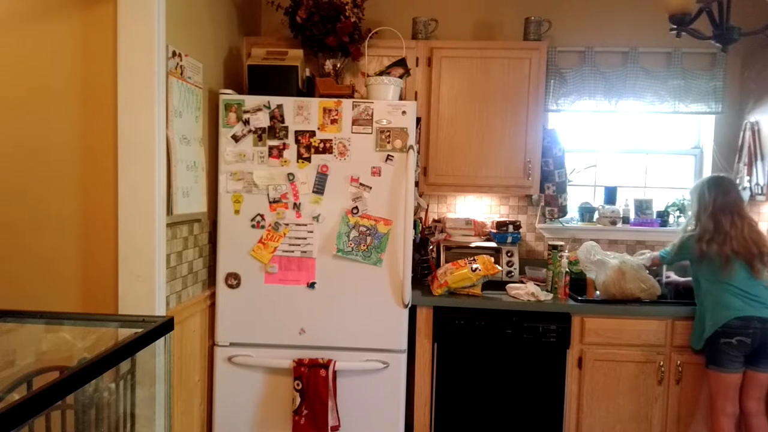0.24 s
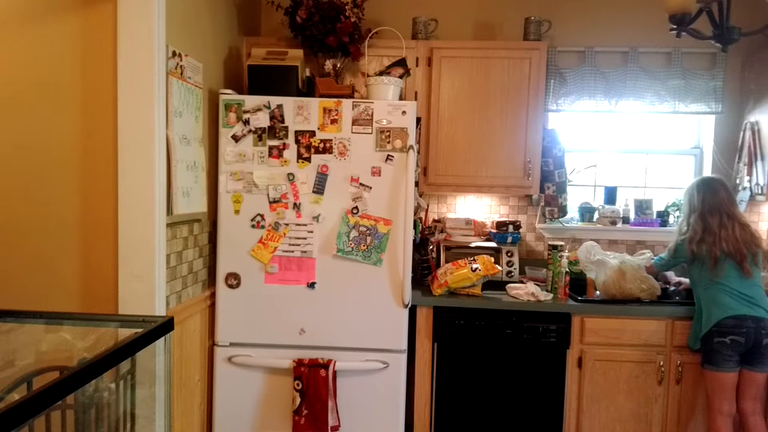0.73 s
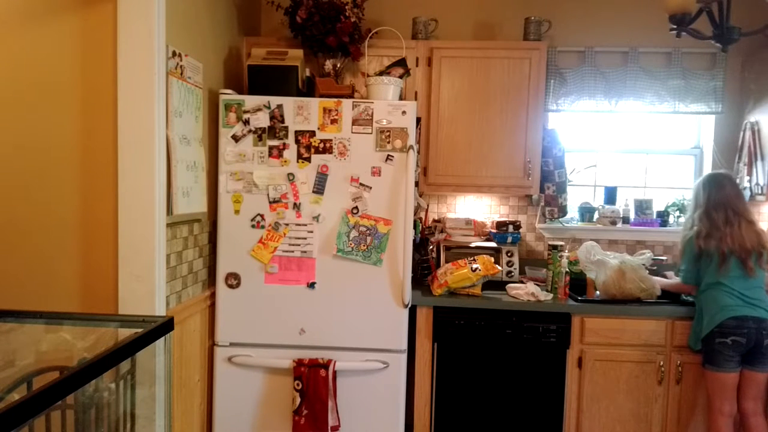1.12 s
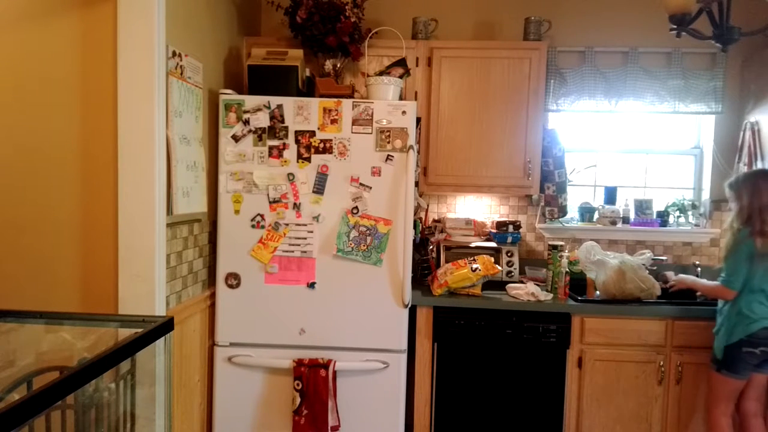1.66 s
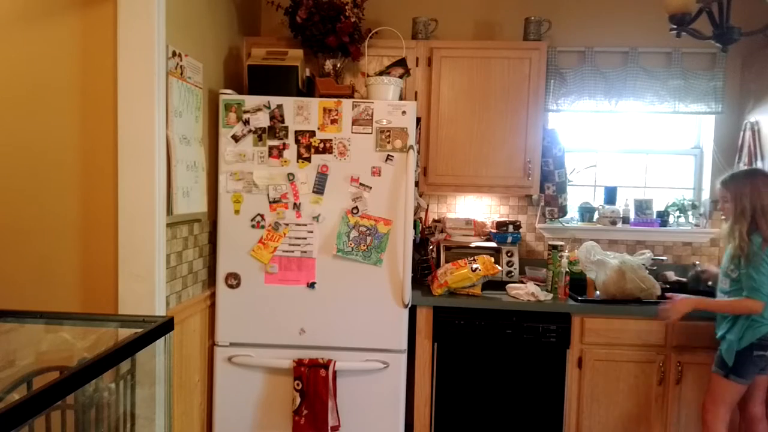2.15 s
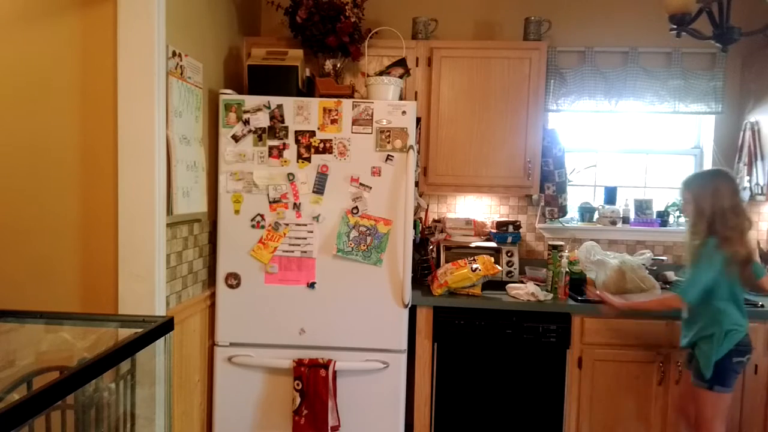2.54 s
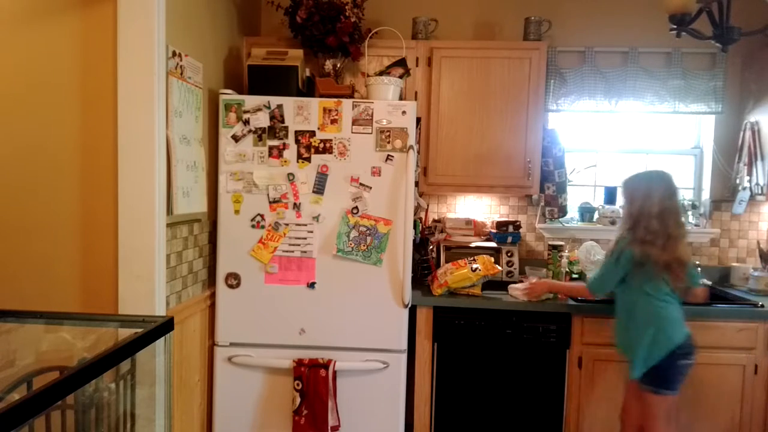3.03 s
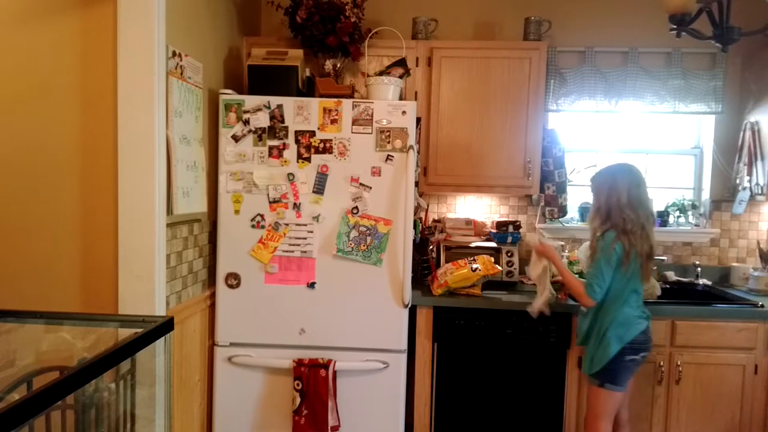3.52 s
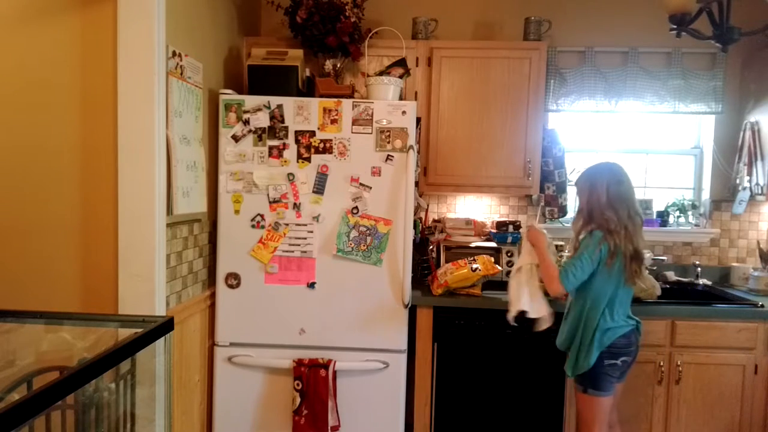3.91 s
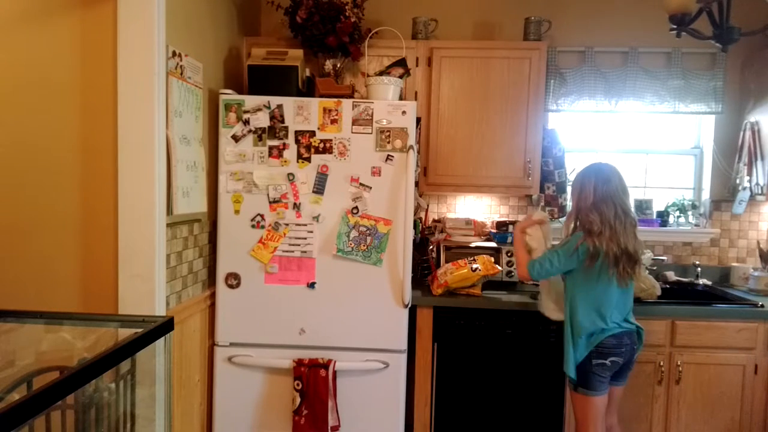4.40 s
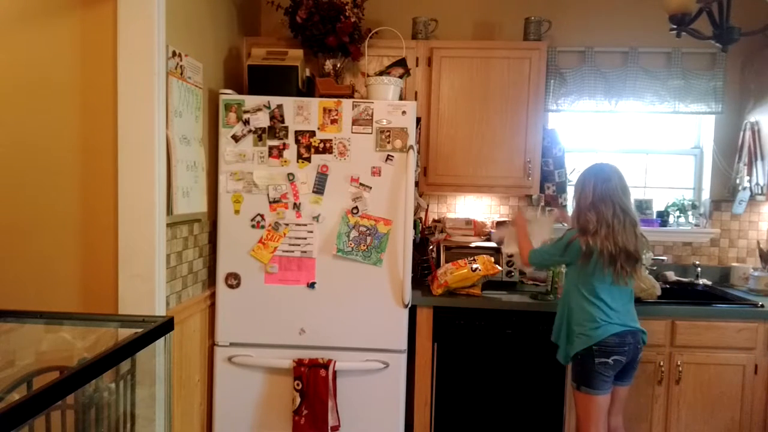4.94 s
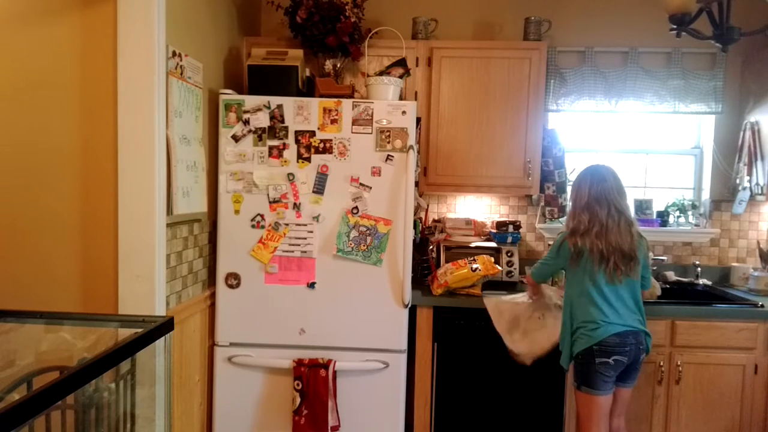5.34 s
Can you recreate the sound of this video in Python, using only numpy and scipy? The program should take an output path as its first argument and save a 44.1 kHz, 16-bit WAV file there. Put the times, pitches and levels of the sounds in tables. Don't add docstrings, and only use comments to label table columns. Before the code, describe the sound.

Over a low pulsing fridge hum, brief running water stops, three loud sink knocks follow, then dull footfalls, two counter clacks and a final cloth rustle.

```python
import sys
import numpy as np
from scipy import signal
from scipy.fft import rfft, irfft, next_fast_len
from scipy.io import wavfile
from scipy.ndimage import uniform_filter1d

SR = 44100
rng = np.random.default_rng(int(sys.argv[2]) if len(sys.argv) > 2 else 0)


def amplitude_ratio(level_db):
    exponent = np.asarray(level_db, float) / 20
    return 10 ** exponent


def dump(signal):
    limited = np.clip(np.atleast_2d(signal).T, -1, 1)
    pcm = np.round(limited * 32767).astype(np.int16)
    wavfile.write(sys.argv[1], SR, pcm)


N = 245716

# pitch_hz, level_db [dB per Hz]
AIR_TONE = [(11, -33.5), (18, -13.5), (27, -23.5), (41, -7), (64, -9), (86, -6.5), (160, -6.5), (189, -10),
            (290, -8), (334, -13), (396, -6), (572, -14), (1040, -14), (1630, -23), (15800, -40.5)]
# pitch_hz, likeness [0..1]
MIC_LIKENESS = [(30, 1), (250, 0.85), (600, 0.78), (1200, 0.36), (2500, 0.05), (6000, 0.017),
                (16000, 0.025)]
# pitch_hz, t60_s
ROOM_T60 = [(60, 0.45), (250, 0.4), (600, 0.28), (1500, 0.37), (4000, 0.35), (9000, 0.31), (16000, 0.24)]
# pitch_hz, level_db
AIR_SHADE = [(60, 2.5), (240, 1), (950, 4), (3770, -1), (15000, -8)]
TAP_SHADE = [(500, 2.5), (1500, 10.5), (4000, 0), (8000, -8), (13000, 4.5)]
BASIN_SHADE = [(100, 2), (400, 2), (2000, 5), (5000, -5.5), (12000, -4.3)]

# time_s, level_db
FLOW = [(0.0, -48.5), (0.29, -56.5), (0.442, -54), (0.502, -51.5), (0.702, -44), (0.748, -49), (0.84, -54),
        (0.93, -72.5), (1.08, -84)]
# pitch_hz, level_db [dB per Hz]
JET_TONE = [(290, -63.5), (500, -10.5), (783, -28), (1140, -10), (1300, -14), (1840, -11.5), (3090, -12.5),
            (4900, -12), (5830, -11), (8130, -15.5), (9120, -12), (10100, -13), (15800, -19.5)]
# pitch_hz, width_hz, level_db
VALVE_MODES = [(4110, 350, -12), (5900, 600, -7), (7270, 320, -10), (9350, 500, -9), (10500, 1400, -4)]
# start_s, length_s, level_db, first_hz, last_hz
GURGLES = [
    (.5, 0.13, -54, 2270, 1620),
    (0.557, 0.1, -49.5, 1540, 2250),
    (0.644, 0.059, -52, 2070, 1930),
    (0.662, 0.043, -48.5, 1120, 940),
]
# start_s, peak_db, tilt_db [per octave], length_s
SPLASHES = [(0.158, -23.5, 2.1, 0.015), (0.3118, -39, 1.5, 0.011), (0.4138, -36, 2, 0.0086),
            (0.4534, -37.5, 0.7, 0.014), (0.4916, -35, -5, 0.013), (0.5204, -60, -3, 0.014),
            (0.756, -22.5, -1, 0.0093), (0.7912, -23, -5.5, 0.036), (0.8885, -31.5, -11.5, 0.0097)]
# pitch_hz, level_db
SPLASH_TONE = [(710, -50), (1200, -26.5), (2870, 2.5), (3640, -1), (4020, 6.5), (5550, 0.5), (6600, 2.5),
               (11200, -6), (15800, -11.5)]

# start_s, level_db
CHINKS = [
    (1.168, -55),
    (1.193, -64),
]
# pitch_hz, level_db, t60_s
CHINK_RING = [(1990, 7.5, 0.044), (2440, 6, 0.065), (3600, 4, 0.034)]
# start_s, peak_db, tilt_db [per octave], length_s, left_right_db
GRAZE = [
    (1.3985, -25.5, 0, .003, 5.5),
]
# start_s, peak_db, crack_db, crack_length_s, left_right_db
KNOCKS = [
    (1.403, -6, 7, 0.0021, -0.5),
    (1.634, -5.5, 1, 0.0056, -0.5),
    (1.875, -3, 5.5, 0.0042, -0.5),
]
# pitch_hz, level_db, t60_s
BASIN_MODES = [
    [(280, -6, 0.074), (325, -8.5, 0.63), (500, -7, 0.056), (595, 0, 0.13), (852, -1, 0.22),
     (1072, -13, .14), (1093, -10.5, 0.2), (1468, 0.5, 0.059)],
    [(281.4, -6.5, 0.06), (338, -6.5, 0.34), (556, -10, .12), (856, -16.5, .1), (1157, -22.5, 0.12),
     (1540, -3, 0.093), (2070, -23.5, 0.23)],
    [(290, -2, 0.072), (309, -8, 0.21), (593, -4, 0.31), (770, 0, 0.07), (1100, -26, .1),
     (1465, 5.5, 0.061), (1870, -36.5, .08)],
]
# pitch_hz, level_db
KNOCK_CRACK = [
    [(120, -26), (220, -8), (400, 2), (700, 0), (1000, 1.5), (1500, -13.5), (2500, -19.5), (4500, -35),
     (9000, -46.5), (15500, -50)],
    [(120, -24.5), (220, -2.5), (400, -3), (750, -16), (1100, -13.5), (1500, -7), (2500, -18.5),
     (4500, -33.5), (9000, -39), (15500, -51.5)],
    [(120, -23), (220, -15), (400, 2.5), (700, -0.5), (1000, -5.5), (1500, -3.5), (2500, -13), (4500, -23),
     (9000, -43.5), (15500, -51)],
]
# pitch_hz, level_db, rise_s
DRUM = [
    (522, -16, .018),
    (528, -11.5, .03),
    (533, -9, .022),
]
# after_s, level_db
MUFFLE = [
    (.048, -20),
    (.052, -22),
    (.052, -19),
]
# pitch_hz, level_db [over the drum], t60_s
RIM_MODES = [(503, -12, .36), (571, -16, .33), (409, -22, .25)]

# start_s, peak_db, tilt_db [per octave], length_s, left_right_db
STEPS = [
    (2.323, -23.5, -2, 0.0047, -1),
    (2.977, -24, -1, 0.0082, -1),
    (3.543, -31, -5.5, 0.006, -0.5),
    (3.579, -45.5, 2.5, 0.011, -3.5),
    (4.319, -40.5, -10.5, 0.0049, 1),
    (5.377, -44, -2.5, 0.0065, 0),
]
# pitch_hz, level_db
STEP_TONE = [(35, -11), (60, -23), (123, -16), (306, -8), (375, -10), (459, -5), (606, -9), (771, -16.5),
             (999, -19), (1180, -30), (1340, -26), (3580, -46.5), (5000, -44.5), (6500, -47.5),
             (11000, -120)]
# start_s, then a list of pitch_hz, level_db, t60_s
FLOOR_BOOM = (2.985, [(33, -49, .45), (52, -58, .3)])
# pitch_hz, level_db, t60_s
BOARD_MODES = [(120, 0.5, 0.14), (200, -5.5, 0.11), (247, 0.5, .12), (316, -5, 0.085), (327.4, -1, .1),
               (413, -4, 0.073), (488, -0.5, 0.089), (577, 1.5, .09)]
# start_s, level_db, favoured_hz
TREADS = [(2.324, -30.5, 466), (2.981, -25.5, 307), (3.544, -45, 540), (4.319, -45.5, 200),
          (5.376, -43.5, 120), (5.422, -46.5, 110)]
# start_s, peak_db, left_right_db
TICKS = [(2.3271, -59.5, -12), (2.4176, -53.5, -6.5), (2.4686, -53.5, -3), (2.5485, -56, -5.5),
         (2.6487, -62.5, 0.5), (2.796, -53, -3), (2.813, -65, 2), (2.9861, -52.5, -5), (3.0297, -52.5, -2),
         (3.1894, -62.5, -6), (3.4488, -59, -1.5), (4.3096, -68, -0.5), (5.1794, -66, -1),
         (5.3392, -65.5, -7)]
# pitch_hz, level_db
TICK_TONE = [(800, 7.5), (2000, 8), (4000, -10.5), (6000, -7), (9000, -4.5), (13000, -14), (16000, -13.5)]
# start_s, peak_db, tilt_db [per octave], length_s, left_right_db
SNAPS = [
    (2.813, -53.5, 0.3, 0.003, -7),
    (5.386, -57.5, -1.5, 0.0027, 9),
]
# start_s, peak_db, tilt_db [per octave], length_s, left_right_db
CLACKS = [
    (3.778, -17.5, 1, 0.00464, 0.67),
    (3.953, -14.5, 0.18, 0.0059, 0.77),
]
DRAGS = [
    (3.79, -23, 0.32, 0.012, 2.7),
    (3.815, -19.5, 1.4, 0.038, 1.1),
    (3.89, -24.5, 3.9, 0.051, 0.54),
    (3.947, -35.5, 10.4, 0.011, 0.78),
]
# pitch_hz, level_db
CLACK_TONE = [(90, -21.5), (130, -6.5), (190, -17), (300, -8), (550, -2), (800, 3.5), (1100, -5),
              (1500, -7.5), (2600, -22.5), (3400, -32), (7000, -42.5), (13000, -54), (15800, -66)]
# pitch_hz, level_db, t60_s
CAN_MODES = [(5520, -43, .07), (5430, -47, .06), (4050, -47, .05), (3930, -50, .05), (2700, -38, .08),
             (2500, -42, .06), (8700, -62, .03), (1470, -50, .05)]
# pitch_hz, level_db [dB per Hz]
CLOTH_TONE = [(180, -43), (300, -26), (545, -22.5), (735, 1), (974, -14.5), (1520, -6.5), (3610, -20),
              (10300, -26), (15800, -36.5)]

OPEN_S, SHUT_S, TURN_S = 0.489, 0.666, 0.048


def evened(x):
    return x / np.sqrt(np.mean(x ** 2) + 1e-20)


def read(points, hz):
    f, value = np.transpose(points)
    return np.interp(np.log(hz + 1), np.log(f + 1), value)


def track(rows):
    s, db = np.transpose(rows)
    return np.interp(np.arange(N) / SR, s, db, -150, -150)


def sides(pan_db):
    return amplitude_ratio(np.array([pan_db / 2, -pan_db / 2]))


def add(mix, s, sound):
    part = mix[:, round(s * SR):][:, :sound.shape[1]]
    part += sound[:, :part.shape[1]]


def high_pass(x, hz, order):
    return signal.sosfilt(signal.butter(order, hz, "high", fs=SR, output="sos"), x)


def resonate(x, hz, width):
    turn = np.exp(2j * np.pi * np.cumsum(hz * np.ones(N)) / SR)
    r = np.exp(-np.pi * width / SR)
    return 2 * (turn * signal.lfilter([1 - r], [1, -r], x / turn)).real


def paired(a, b, hz):
    same = np.clip(read(MIC_LIKENESS, hz), 0, 1)[:, None]
    return np.array([a, same * a + np.sqrt(1 - same ** 2) * b])


def shaded(x, balance):
    size = next_fast_len(N)
    gains = sides(read(balance, np.fft.rfftfreq(size, 1 / SR)))
    return irfft(rfft(x, size) * gains, size)[:, :N]


def hiss(tone, patchy_db, flicker_db, size=512):
    frames, hz = 4 * N // size + 5, np.fft.rfftfreq(size, 1 / SR)
    a, b, c, d, patches = rng.standard_normal((frames, len(hz), 5)).T
    patches = uniform_filter1d(patches, size=6, axis=0)
    patches = evened(uniform_filter1d(patches, size=12, axis=1))
    flicker = evened(uniform_filter1d(rng.standard_normal(frames), size=3))
    level_db = read(tone, hz)[:, None] + patchy_db * patches + flicker_db * flicker
    z = paired(a + 1j * b, c + 1j * d, hz) * amplitude_ratio(level_db)
    return evened(signal.istft(z, nperseg=size, noverlap=3 * size // 4)[1][:, :N])


def room(direct, build_s, early=6.0):
    size = SR // 3
    taps = np.zeros((2, size))
    at = np.arange(110, size - 20, 20) + rng.integers(0, 20, (2, (size - 111) // 20))
    np.put_along_axis(taps, at, rng.choice([-1., 1.], at.shape), 1)
    hz, t, z = signal.stft(taps, SR, nperseg=256)
    z = paired(z[0], z[1], hz) * amplitude_ratio(-60 * t / read(ROOM_T60, hz)[:, None])
    tail = signal.istft(z, SR, nperseg=256)[1][:, :size]
    since = np.maximum(np.arange(size) - 110, 0) / SR
    tail = tail * (1 - np.exp(-since / build_s)) * (1 + early * np.exp(-since / 0.0018))
    return tail / np.linalg.norm(tail[0]) + direct * (np.arange(size) == 0)


def heard_in(walls, source):
    return signal.fftconvolve(source[None], walls, axes=1)


def burst(tone, tilt_db, length_s):
    t, hz = np.arange(4096) / SR, abs(np.fft.fftfreq(4096, 1 / SR))
    level_db = read(tone, hz) + tilt_db * np.log2(hz / 1000 + 0.073)
    log_gain = np.log(amplitude_ratio(level_db) + 1e-5)
    colour = np.fft.ifft(np.exp(np.conj(signal.hilbert(log_gain)))).real
    fade = np.exp(-t / max(length_s, 0.001))
    chatter = rfft(rng.standard_normal(len(t)) * fade)
    chatter = irfft(chatter / abs(chatter)) * np.sqrt(fade)
    out = signal.fftconvolve(chatter, colour)[:len(t)]
    return out / np.linalg.norm(out)


def ring(modes, shorten, rise_s=0.00056):
    t = np.arange(SR // 3) / SR
    partials = np.zeros(len(t))
    for hz, db, t60 in modes:
        partials += amplitude_ratio(db - 60 * t / min(t60 * shorten, 0.6)) * np.sin(2 * np.pi * hz * t)
    return partials * (1 - np.exp(-t / rise_s))


def blows(rows, tone, lift_db, direct, build_s):
    out = np.zeros((2, N))
    for s, db, tilt_db, length_s, pan_db in rows:
        wet = heard_in(room(direct, build_s), burst(tone, tilt_db, length_s))
        add(out, s, amplitude_ratio(db + lift_db) * sides(pan_db)[:, None] * wet)
    return out


def refrigerator():
    hum_hz, beat_hz, beat_null_s, second_share = 61.15, 2.41, 0.07, 0.75
    t = np.arange(N) / SR
    waver = uniform_filter1d(rng.standard_normal(N), size=2500)
    waver = evened(uniform_filter1d(waver, size=2500))
    turns = np.cumsum(hum_hz + 0.3 * waver) / SR
    field = np.sin(2 * np.pi * turns)
    second_motor = np.sin(2 * np.pi * (turns - beat_hz * (t - beat_null_s)))
    return amplitude_ratio(-66.5 + 1.1 * waver) * 1.3 * (field - second_share * second_motor)


def kitchen_air():
    air_db, wash_db, wash_t60, pipe_db = -58, 6.5, 0.79, 2
    t = np.arange(N) / SR
    wash = sum((t > s) * amplitude_ratio(wash_db - 60 * (t - s) / wash_t60) ** 2 for s, *_ in KNOCKS + CLACKS)
    pipes = amplitude_ratio(pipe_db * np.clip(SHUT_S + 1 / 3 - t, 0, 1 / 3) * 2.64)
    air = hiss(AIR_TONE, patchy_db=-0.84, flicker_db=1.34, size=2048)
    return amplitude_ratio(air_db - 1.54) * np.sqrt(1 + wash) * pipes * air


def towel():
    start_s, start_db, unfold_db_per_s, lift_db_per_s = 5.447, -61, 109, 402
    t = np.arange(N) / SR
    level_db = start_db + unfold_db_per_s * (t - start_s) - lift_db_per_s * np.maximum(start_s - t, 0)
    return amplitude_ratio(level_db) * hiss(CLOTH_TONE, patchy_db=1.2, flicker_db=1.2, size=256)


def ticks():
    rows = [(s, db, 3.2, 0.018, pan_db) for s, db, pan_db in TICKS]
    chatter = blows(rows, TICK_TONE, lift_db=25.5, direct=0.2037, build_s=0.0036)
    return chatter + blows(SNAPS, TICK_TONE, lift_db=20.5, direct=0.95, build_s=0.0021)


def boards():
    out = np.zeros((2, N))
    for s, db, favoured_hz in TREADS:
        modes = [(f, d - 13.7 * abs(np.log2(f / favoured_hz)), t60) for f, d, t60 in BOARD_MODES]
        wet = heard_in(room(direct=0.56, build_s=0.0016), ring(modes, shorten=0.58))
        add(out, s, amplitude_ratio(db - 2.0) * wet)
    return out


def steps():
    out = blows(STEPS, STEP_TONE, lift_db=21.5, direct=0.22, build_s=0.0023)
    out = high_pass(out, 170, order=2)
    start_s, modes = FLOOR_BOOM
    add(out, start_s, np.tile(ring(modes, shorten=0.97, rise_s=0.027), (2, 1)))
    return out


def valve_whistle(jet):
    whistle_hz, whistle_db, sag_db_per_s, turn_db = 9025, -39.5, -32.5, -21.5
    t = np.arange(N) / SR
    shut_db = whistle_db + sag_db_per_s * (SHUT_S - OPEN_S)
    gap_db = track([(OPEN_S - TURN_S, whistle_db + turn_db), (OPEN_S, whistle_db),
                    (SHUT_S, shut_db), (SHUT_S + TURN_S, shut_db + turn_db)])
    note = evened(resonate(resonate(jet, whistle_hz, 110), whistle_hz, 200))
    note = note / np.sqrt(abs(uniform_filter1d(note ** 2, size=1800)) + 0.06)
    catch_s = [OPEN_S - 0.012, OPEN_S, SHUT_S + 0.025, SHUT_S + 0.04]
    note = note * amplitude_ratio(np.interp(t, catch_s, [-10, 3.5, 4.0, -14]))
    body = sum(amplitude_ratio(db) * evened(resonate(jet, hz, width)) for hz, width, db in VALVE_MODES)
    return amplitude_ratio(gap_db - 1.0) * (note + body)


def gurgles(jet):
    t, out = np.arange(N) / SR, 0
    for s, length_s, db, first_hz, last_hz in GURGLES:
        way = np.clip((t - s) / length_s, 0, 1)
        hz = first_hz + (last_hz - first_hz) * way
        swell = np.sqrt(abs(np.sin(np.pi * way))) * (way < 1)
        out = out + amplitude_ratio(db) * swell * evened(resonate(resonate(jet, hz, 330), hz, 520))
    return out


def tap():
    t = np.arange(N) / SR
    jet = hiss(JET_TONE, patchy_db=1.5, flicker_db=1.0, size=256)
    top = high_pass(jet, 9000, order=4)
    top_db = np.interp(t, [OPEN_S - TURN_S, OPEN_S], [2.5, -22.5])
    stream = amplitude_ratio(track(FLOW) + 0.5) * (jet + (amplitude_ratio(top_db) - 1) * top)
    stream = stream + valve_whistle(jet) + gurgles(jet)
    drops = [(*row, -2.5) for row in SPLASHES]
    splashes = blows(drops, SPLASH_TONE, lift_db=8.5, direct=0.6, build_s=0.0012)
    return stream * sides(-4)[:, None] + splashes


def clacks():
    out = blows(CLACKS + DRAGS, CLACK_TONE, lift_db=17, direct=0.3, build_s=0.0015)
    for s, db in ((CLACKS[0][0], -2), (DRAGS[2][0], -11)):
        wet = heard_in(room(direct=1.2, build_s=0.003), ring(CAN_MODES, shorten=0.7))
        add(out, s, amplitude_ratio(db) * wet)
    return out


def dish_touches():
    out = blows(GRAZE, CLACK_TONE, lift_db=11.5, direct=0.6, build_s=0.002)
    for s, db in CHINKS:
        wet = heard_in(room(direct=0.3, build_s=0.0025), ring(CHINK_RING, shorten=0.35))
        add(out, s, amplitude_ratio(db) * wet)
    return out


def basin_boom(k, peak_db):
    (hz, drum_db, rise_s), (after_s, drop_db) = DRUM[k], MUFFLE[k]
    drum_db = drum_db - peak_db
    drum_modes = [(hz, drum_db + 11, 0.45), (0.955 * hz, drum_db + 4, 0.45)]
    boom = ring(BASIN_MODES[k], shorten=1.1, rise_s=0.002) + ring(drum_modes, shorten=1, rise_s=rise_s)
    settled = np.clip((np.arange(len(boom)) / SR - after_s) / 0.036, 0, 1)
    boom = boom * amplitude_ratio(drop_db * settled - 11)
    return boom + amplitude_ratio(drum_db) * ring(RIM_MODES, shorten=1, rise_s=0.04)


def knocks():
    out = np.zeros((2, N))
    for k, (s, db, crack_db, length_s, pan_db) in enumerate(KNOCKS):
        boom = basin_boom(k, db)
        walls = room(direct=0.48, build_s=0.00084, early=3.1)
        wet = amplitude_ratio(-14) * heard_in(walls, boom)
        add(wet, 0.002, np.tile(boom, (2, 1)))
        add(wet, 0, amplitude_ratio(crack_db + 12.5) * heard_in(walls, burst(KNOCK_CRACK[k], 0, length_s)))
        wet = high_pass(wet, 190, order=4)
        add(out, s, amplitude_ratio(db) * sides(pan_db)[:, None] * wet)
    return out


def scene():
    background = shaded(kitchen_air() + refrigerator() + towel(), AIR_SHADE)
    water = shaded(tap(), TAP_SHADE)
    contacts = boards() + steps() + clacks() + dish_touches() + knocks()
    return background + ticks() + water + shaded(contacts, BASIN_SHADE)


def top_cut(x):
    return signal.sosfilt(signal.butter(12, 15950, fs=SR, output="sos"), x)


def record(dry):
    mix = dry + 0.0008
    return top_cut(mix)


dry = scene()
out = record(dry)
dump(out)
```